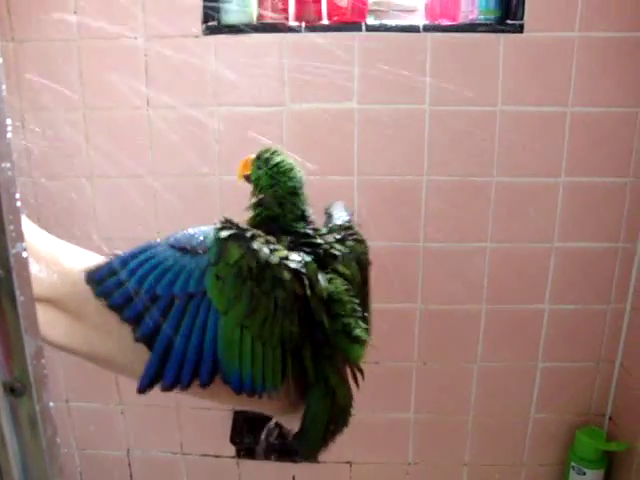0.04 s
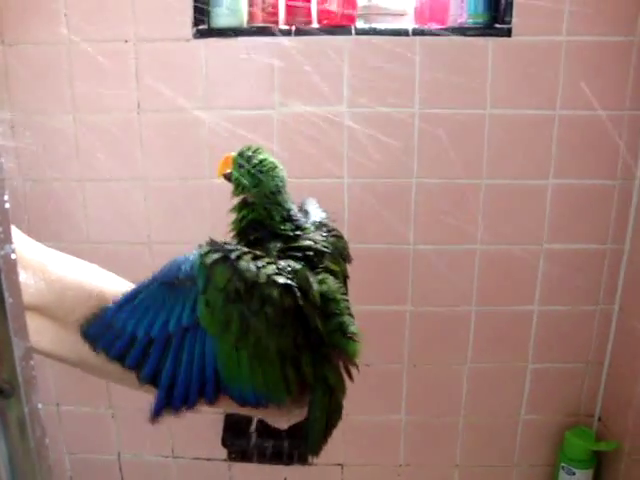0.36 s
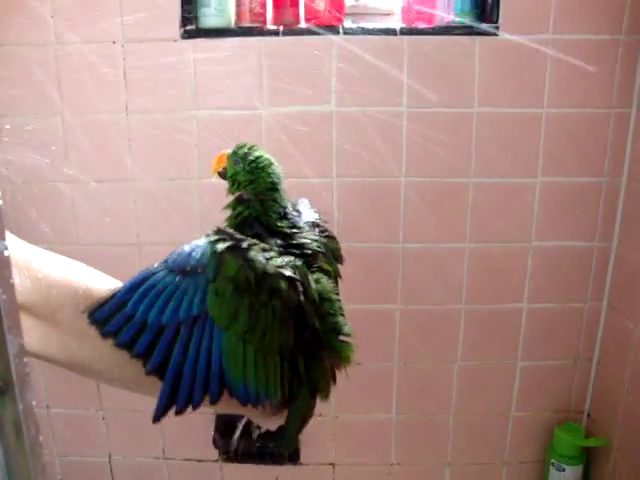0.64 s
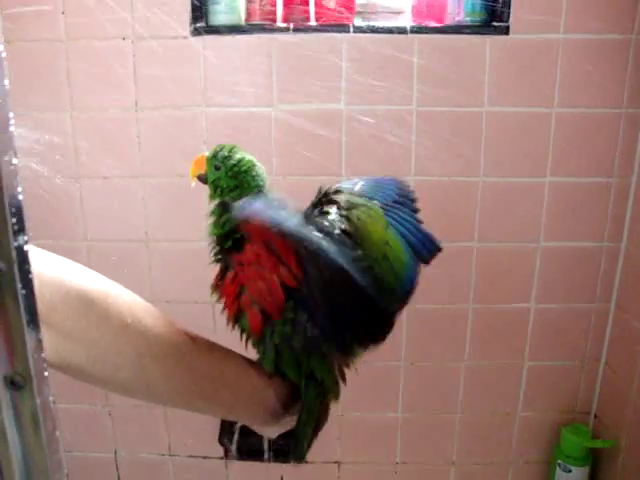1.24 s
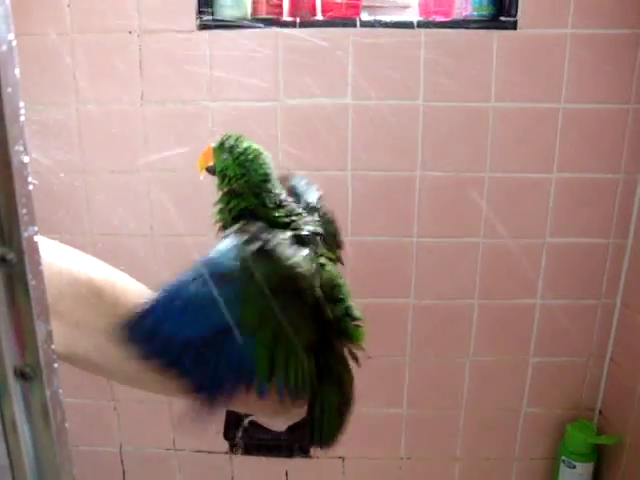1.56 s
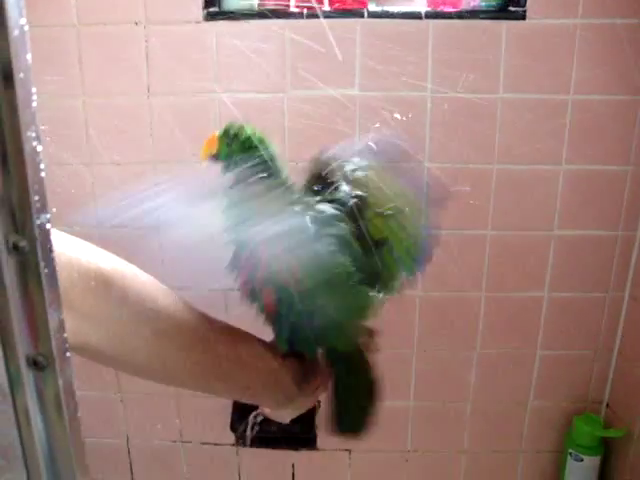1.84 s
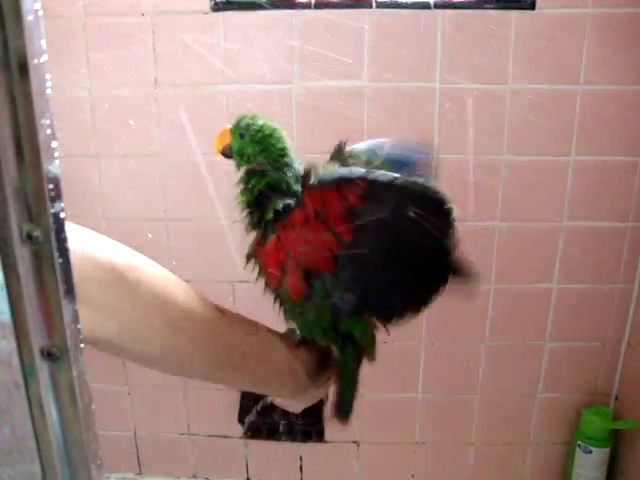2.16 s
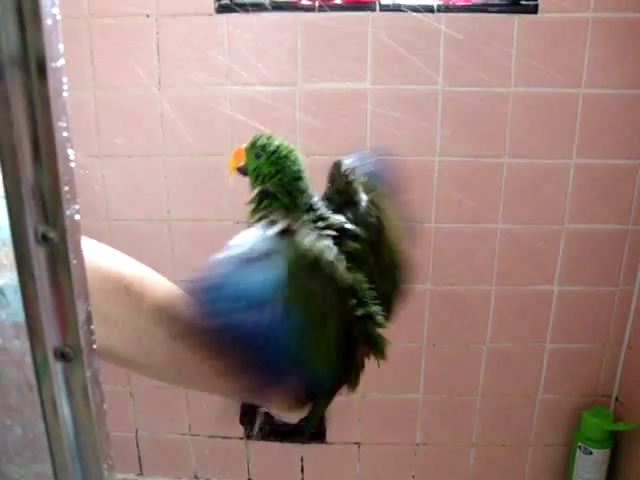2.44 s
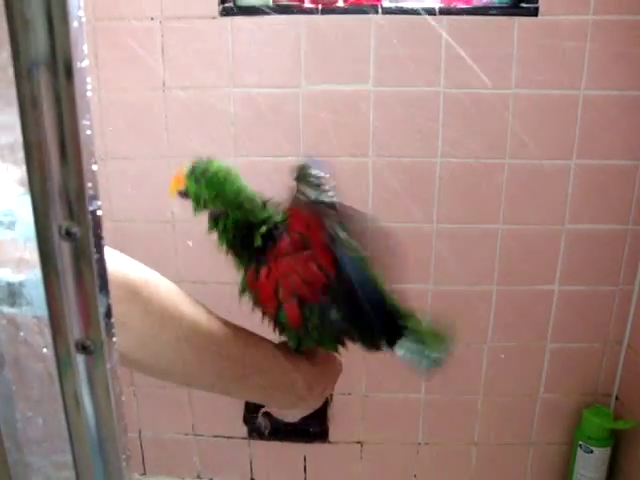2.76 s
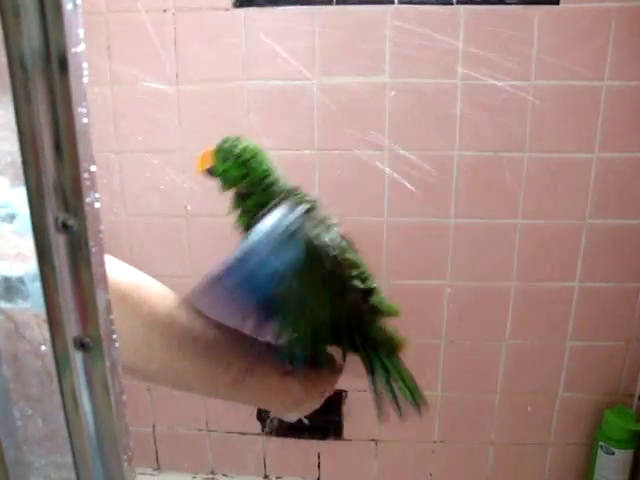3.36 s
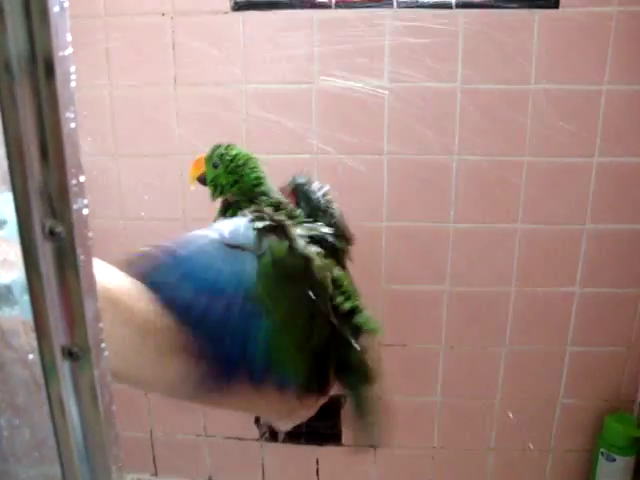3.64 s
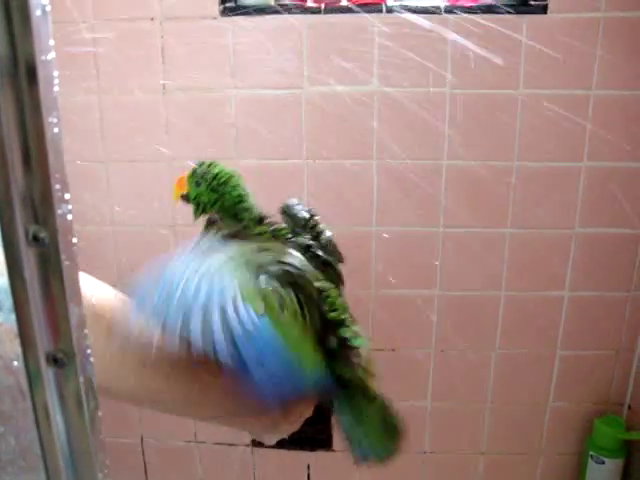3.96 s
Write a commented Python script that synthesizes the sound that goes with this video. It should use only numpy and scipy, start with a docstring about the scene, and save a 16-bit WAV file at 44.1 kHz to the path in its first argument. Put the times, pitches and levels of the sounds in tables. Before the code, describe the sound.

A running shower sprays steadily in a tiled bathroom as a bird flings off water.

```python
"""A parrot in the shower

A parrot beats its wings under a running shower in a small tiled bathroom; we hear mostly the water.
Fine spray hisses and patters on tiles and feathers, and the jets drum a hollow note near 1 kHz.
Bigger dollops, shed by the wet wings, slap down between a few soft low swells and echo off the tiles."""
import sys
import numpy as np
from scipy import signal
from scipy.fft import rfft, irfft
from scipy.io import wavfile
from scipy.ndimage import uniform_filter1d

SR = 44100
rng = np.random.default_rng(int(sys.argv[2]) if len(sys.argv) > 2 else 0)


def file_out(sig):
    """Save sig as 16-bit WAV at sys.argv[1]."""
    # one column per channel
    cols = np.atleast_2d(sig).T
    # limit, then scale
    lim = np.clip(cols, -1, 1)
    pcm = np.round(lim * 32767).astype(np.int16)
    wavfile.write(sys.argv[1], SR, pcm)


N = 176400  # 4 seconds

# The echo of the tiles. Each row: pitch in Hz, seconds it takes to fade by 60 dB.
ECHO_TIMES = [(1000, 0.18), (3000, 0.32), (10000, 0.065)]
# The tone of the fine spray. Each row: pitch in Hz, relative level in dB.
HISS_TONE = [(30, -28.5), (90, -38.5), (150, -27), (200, -33), (300, -22.5), (450, -14.5), (620, -11),
             (800, -10), (1150, -9.5), (1450, -13.5), (2000, -9), (2800, -6.5), (4400, -7.5), (6500, -4.5),
             (8500, -8), (10000, -14)]
# The tone of the separate drops. Each row: pitch in Hz, relative level in dB.
PATTER_TONE = [(300, -55), (700, -21), (1100, -25), (1600, -10), (2800, -12), (4500, -1), (7000, -2),
               (10000, 0.5)]
# The spray's strength as the bird moves through it. Each row: time in seconds, gain in dB.
SPRAY_STRENGTH = [(0, -2), (.25, -0.2), (.43, -1.5), (.65, -0.5), (.87, -1.5), (1.0, -1.5), (1.3, -0.5),
                  (1.6, -3), (1.75, -3), (1.95, -1.4), (2.2, -1.8), (2.52, -2.5), (2.65, -1), (3.0, -3),
                  (3.25, -0.5), (3.45, -0.8), (3.6, -1), (3.8, -1.5), (4, -2.5)]
# The hollow notes of the shower stall. Each row: pitch in Hz, half width in Hz, relative level in dB.
STALL_NOTES = [(112.6, 9.8, -78), (203, 6.5, -65.5), (238.8, 6.3, -63.5), (312, 25, -61),
               (467.3, 14, -63.5), (581.7, 21, -54), (842.3, 25, -52), (927, 21, -49.5), (957.2, 16.5, -45),
               (1002.4, 31, -45), (1102, 50, -54), (1574, 7.7, -64), (2089, 12, -52)]
# The strength of the drumming. Each row: time in seconds, gain in dB.
DRUM_STRENGTH = [(0, 0), (.45, 1), (.68, 1.5), (.82, 4.5), (.95, -.5), (1.3, 1), (1.9, -1), (2.3, 0.5),
                 (2.65, -1), (3.05, 0), (3.2, 3.5), (3.5, 2.5), (3.75, 2.5), (4, 5)]
# Soft low swells, probably the wings or wet body. Each row: time of the peak in seconds, pitch in Hz,
# half width in octaves, peak level in dB, rough half length in seconds.
LOW_SWELLS = [(.78, 210, 0.22, -52, .07), (1.391, 400, .9, -47.5, 0.064), (1.59, 700, 0.29, -42, 0.019),
              (2.103, 960, 0.75, -34.5, 0.018), (2.458, 1086, 0.064, -41.5, 0.055),
              (3.201, 486, 0.85, -43, .045), (3.963, 334, 0.41, -48, 0.036)]
# Dollops of water landing. Each row: start in seconds, pitch in Hz, half width in octaves,
# relative level in dB, fade time in seconds.
DOLLOPS = [(0.004, 6600, 0.49, -25, 0.016), (0.038, 6500, 0.27, -24.5, 0.013),
           (0.067, 5230, 0.5, -24, 0.0048), (0.135, 2890, 0.15, -30, 0.015),
           (0.161, 4700, 0.25, -23.5, 0.0069), (0.205, 4950, 0.41, -26.5, 0.015),
           (0.297, 3720, 0.16, -32, 0.015), (0.327, 3470, 0.31, -29.3, 0.015),
           (0.345, 4170, 0.43, -21, 0.018), (0.528, 3770, 0.21, -21.5, 0.01),
           (0.575, 4300, 0.32, -21.6, 0.017), (0.659, 4770, 0.36, -25, 0.017),
           (0.683, 3420, 0.49, -22.0, 0.014), (0.747, 5000, 0.2, -27, 0.008),
           (0.825, 1450, 0.63, -32.5, 0.015), (0.952, 6340, 0.33, -22, 0.0094),
           (0.971, 5300, 0.48, -20, 0.031), (1.022, 3720, 0.12, -28, 0.0049),
           (1.132, 5050, 0.61, -22.7, 0.019), (1.15, 4020, 0.72, -24, 0.035),
           (1.245, 6350, 0.32, -21.5, 0.018), (1.332, 6400, 0.36, -27, 0.009),
           (1.385, 4670, 0.26, -19.5, 0.015), (1.387, 2290, 0.26, -29.5, 0.017),
           (1.416, 4600, 0.18, -25, 0.012), (1.476, 4800, 0.36, -29.5, 0.006),
           (1.496, 2800, 0.2, -19, 0.015), (1.501, 6240, 0.15, -24.5, 0.019),
           (1.517, 3050, 0.26, -21.5, 0.0041), (1.536, 3200, 0.28, -17.9, 0.016),
           (1.574, 4100, 0.44, -22.5, 0.028), (1.58, 1200, 0.74, -29, 0.03),
           (1.597, 4530, 0.22, -23.5, 0.015), (1.659, 2460, 0.2, -29.5, 0.011),
           (1.825, 3550, 0.22, -29, 0.013), (1.845, 6100, 0.36, -25.5, 0.02),
           (1.902, 4620, 0.71, -23, 0.032), (1.922, 5000, 0.43, -22, 0.024),
           (2.022, 4350, 0.53, -23, 0.008), (2.193, 5730, 0.55, -22.5, 0.03),
           (2.228, 4200, 0.49, -25.5, 0.02), (2.278, 2680, 0.37, -17.5, 0.022),
           (2.324, 4050, 0.45, -18.5, 0.026), (2.371, 4050, 0.41, -29, 0.014),
           (2.441, 6550, 0.35, -23.5, 0.032), (2.549, 4440, 0.59, -25, 0.028),
           (2.602, 4850, 0.26, -22.5, 0.03), (2.716, 2530, 0.73, -24, 0.016),
           (2.759, 7850, 0.35, -29.5, 0.004), (2.81, 4300, 0.28, -24.7, 0.008),
           (2.834, 6300, 0.27, -26.5, 0.005), (2.893, 4400, 0.24, -20, 0.029),
           (3.004, 1620, 0.39, -29.3, 0.032), (3.083, 4180, 0.32, -24.5, 0.017),
           (3.155, 4160, 0.25, -26, 0.0069), (3.302, 2920, 0.48, -23.3, 0.022),
           (3.357, 4000, 0.47, -19.5, 0.011), (3.548, 7500, 0.35, -27, 0.029),
           (3.665, 3410, 0.32, -23.5, 0.025), (3.699, 3180, 0.27, -34, 0.0085),
           (3.749, 5970, 0.34, -31, 0.015), (3.819, 5600, 0.58, -23.5, 0.027),
           (3.925, 2930, 0.23, -24.5, 0.0054)]


def gain_of(db):
    """Turns decibels into a number to multiply a sound by."""
    return 10 ** (np.asarray(db) / 20)


def evened(x):
    """Scales a signal so that its average power is 1."""
    return x / np.sqrt(np.mean(x ** 2) + 1e-20)


def value_at(table, hz):
    """Looks up a pitch in a table, gliding between rows on a musical (log) scale."""
    pitches, values = np.transpose(table)
    return np.interp(np.log(hz + 1), np.log(pitches + 1), values)


def gain_curve(table):
    """Turns rows of seconds and dB into a gain for every sample."""
    return gain_of(np.interp(np.arange(N) / SR, *np.transpose(table)))


def add(mix, start_s, sound):
    """Mixes a sound in at its start time."""
    part = mix[max(round(start_s * SR), 0):][:len(sound)]
    part += sound[:len(part)]


def bell(hz, centre_hz, octaves):
    """A hill of power around one pitch."""
    return np.exp(-(np.log2((hz + 1) / centre_hz) / octaves) ** 2)


def tick(db_at, size=2048):
    """A sharp click whose tone follows db_at(hz)."""
    db = db_at(abs(np.fft.fftfreq(size, 1 / SR)))
    log_gain = np.log(gain_of(np.maximum(db - db.max(), -90)))
    spectrum = np.exp(np.conj(signal.hilbert(log_gain)))  # packs the energy at the start
    click = np.fft.ifft(spectrum).real[:size // 2]
    return click / np.linalg.norm(click)


def droplets(t, per_second):
    """Tiny droplets land at random, each making one spike up or down."""
    return rng.choice([-1, 1], len(t)) * (rng.random(len(t)) < per_second / SR)


def tile_echo(x, echo_db, size=256):
    """The tiles throw a sound back many times, each pitch dying away at its own speed."""
    bounces = rng.standard_normal(SR // 3) * (np.arange(SR // 3) > SR / 500)  # start after 2 ms
    hz, t, bands = signal.stft(bounces, SR, nperseg=size)
    fade = np.exp(-np.log(1000) * t / value_at(ECHO_TIMES, hz)[:, None])
    tail = signal.istft(bands * fade, SR, nperseg=size)[1]
    echo = signal.fftconvolve(x, tail / np.linalg.norm(tail))[:len(x)]
    echo_gain = gain_of(echo_db)
    return (x + echo_gain * echo) / np.hypot(1, echo_gain)


def hiss(patch_db=3.8, surge_db=1.55, treble_hz=1790, size=512):
    """Countless tiny droplets blur into a hiss whose treble flickers in patches and quick surges."""
    hop = size // 4
    frames, hz = N // hop + 5, np.fft.rfftfreq(size, 1 / SR)
    real, imag, patches = rng.standard_normal((3, frames, len(hz)))
    patches = uniform_filter1d(patches, size=9, axis=0)  # smooth over time
    patches = evened(uniform_filter1d(patches, size=16, axis=1))  # and over pitch
    surge = evened(uniform_filter1d(rng.standard_normal(frames), size=8))
    treble_share = hz ** 2 / (hz ** 2 + treble_hz ** 2)
    flicker = gain_of((patch_db * patches + surge_db * surge[:, None]) * treble_share)
    noise = signal.istft(((real + 1j * imag) * flicker).T, nperseg=size, noverlap=size - hop)[1][:N]
    tone = gain_of(value_at(HISS_TONE, np.fft.rfftfreq(N, 1 / SR)))
    return gain_of(-24.5) * evened(irfft(rfft(noise) * tone, N))


def patter(drops_per_second=600, spread_db=4, spatter_s=0.0043, spots=40):
    """Drops of all sizes break into droplets on the tiles; each spot has its own tone and echo."""
    sizes = gain_of(spread_db * np.minimum(rng.exponential(1, N), 2.9))
    hits = sizes * droplets(sizes, drops_per_second)
    spot_hit = rng.integers(0, spots, N)
    out, t = np.zeros(N), np.arange(SR // 5) / SR
    for spot, centre_hz in enumerate(np.geomspace(2500, 9500, spots)):
        spatter = droplets(t, per_second=5000) * np.exp(-t / spatter_s)
        click = tick(lambda hz: 10 * np.log10(bell(hz, centre_hz, octaves=0.49) + 0.028))
        drop = tile_echo(evened(signal.fftconvolve(spatter, click)), echo_db=-7.5)
        out += signal.oaconvolve(hits * (spot_hit == spot), drop)[:N]
    tone = tick(lambda hz: value_at(PATTER_TONE, hz))
    return gain_of(-24.5) * evened(signal.oaconvolve(out, tone)[:N])


def drumming():
    """The jets keep the hollow notes of the stall ringing."""
    hz, out = np.fft.rfftfreq(N, 1 / SR), np.zeros(N)
    for centre_hz, half_width_hz, db in STALL_NOTES:
        jets = rfft(rng.standard_normal(N))
        ring = 1 / (1 + 1j * (hz - centre_hz) / half_width_hz) ** 2
        out += gain_of(db) * evened(irfft(jets * ring, N))
    return gain_curve(DRUM_STRENGTH) * out


def swell(centre_hz, octaves, db, half_length_s):
    """A soft low rush grows and fades, probably the wings or wet body."""
    t = np.arange(-SR // 4, SR // 4) / SR
    tone = np.sqrt(bell(np.fft.rfftfreq(len(t), 1 / SR), centre_hz, octaves))
    rush = irfft(rfft(rng.standard_normal(len(t))) * tone, len(t))
    rise_and_fall = np.exp(-.5 * (t / half_length_s) ** 2)
    return gain_of(db) * evened(rush) * rise_and_fall


def splash(centre_hz, octaves, db, fade_s, rise_s=0.0006):
    """A dollop from the wings slaps down and bursts into droplets that quickly fade."""
    def tone_db(hz):
        wide_spatter = gain_of(-14) ** 2 * bell(hz, centre_hz, octaves=1.15)
        return 10 * np.log10(bell(hz, centre_hz, octaves) + wide_spatter + 1e-9)

    t = np.arange(SR // 3) / SR
    burst = droplets(t, per_second=8000) * np.minimum(t / rise_s, 1) * np.exp(-t / fade_s)
    slap = signal.fftconvolve(burst, tick(tone_db))
    opening_level = np.sqrt(np.mean(slap[:SR // 50] ** 2))  # the first 20 ms
    return gain_of(db + 1) * tile_echo(slap / opening_level, echo_db=-7)


def scene():
    """Lays the swells and splashes over the spray and drumming, in one channel."""
    mix = gain_curve(SPRAY_STRENGTH) * (hiss() + patter()) + drumming()
    for peak_s, *settings in LOW_SWELLS:
        sound = swell(*settings)
        add(mix, peak_s - len(sound) / SR / 2, sound)
    for start_s, *settings in DOLLOPS:
        add(mix, start_s, splash(*settings))
    return mix[None]


def record(dry):
    """Cuts away the highest treble, above about 10 kHz."""
    low_pass = signal.firwin(1023, 10080, window=("kaiser", 9), fs=SR)
    return signal.oaconvolve(dry, low_pass[None], "same")


dry = scene()
out = record(dry)
file_out(out)
```